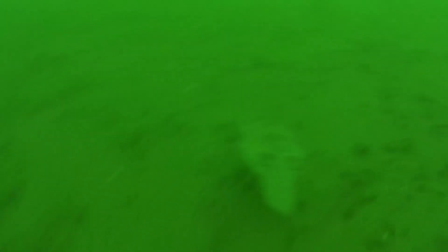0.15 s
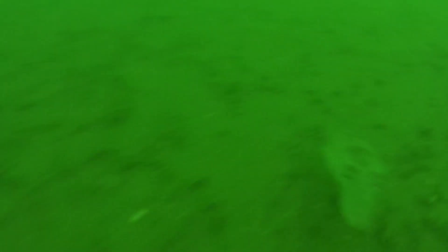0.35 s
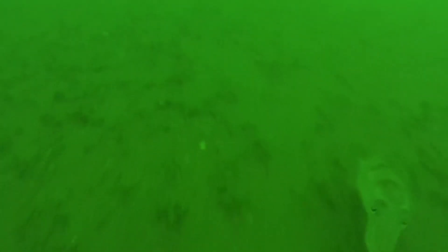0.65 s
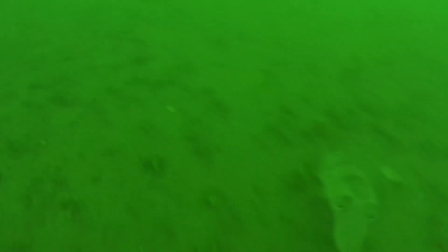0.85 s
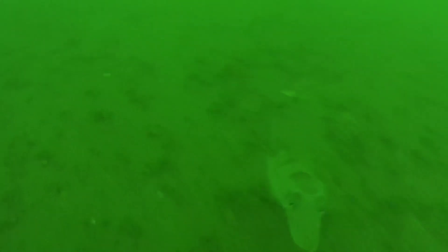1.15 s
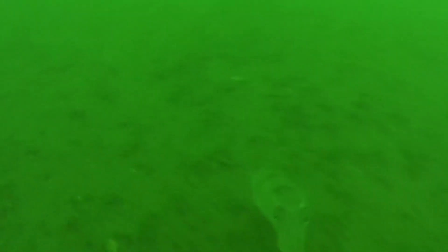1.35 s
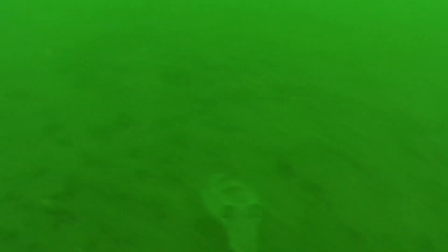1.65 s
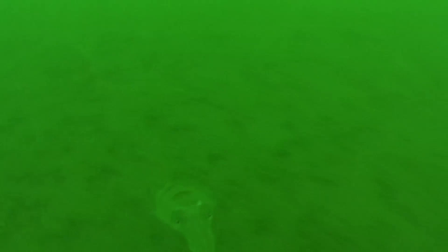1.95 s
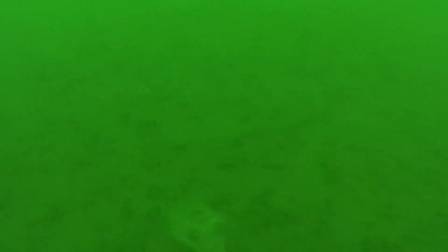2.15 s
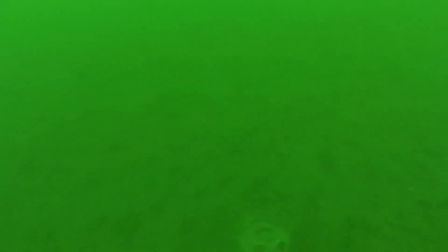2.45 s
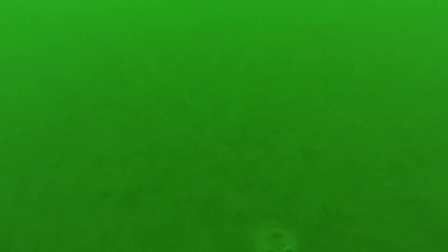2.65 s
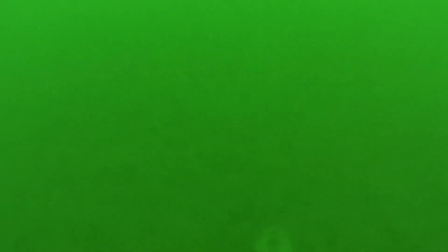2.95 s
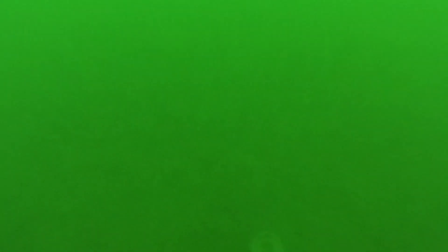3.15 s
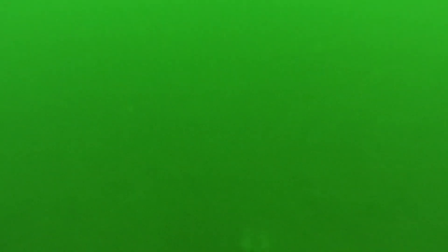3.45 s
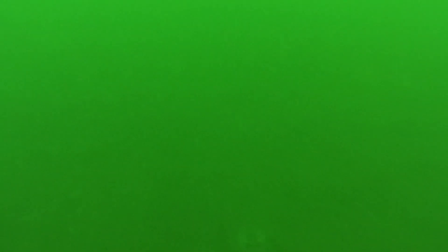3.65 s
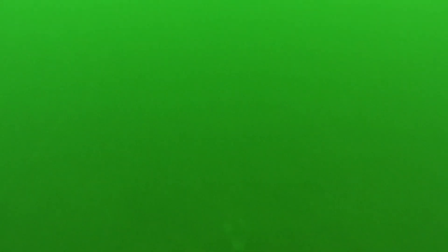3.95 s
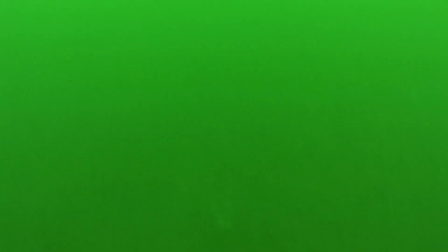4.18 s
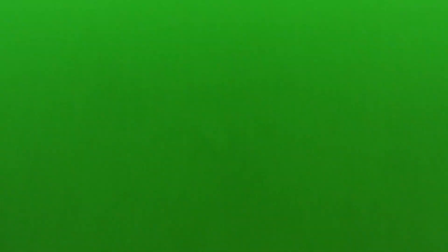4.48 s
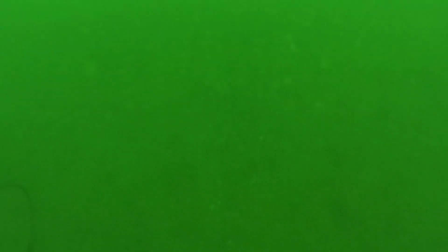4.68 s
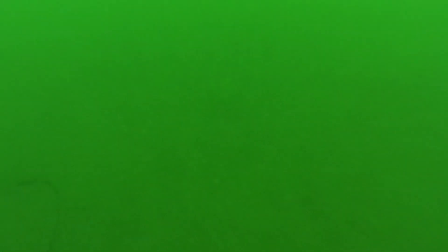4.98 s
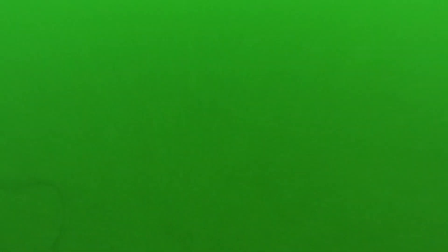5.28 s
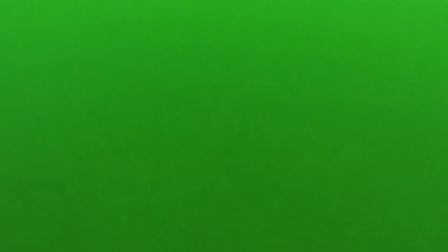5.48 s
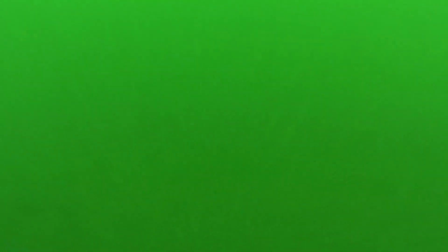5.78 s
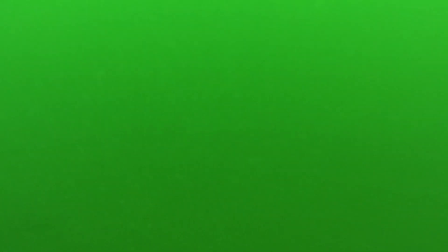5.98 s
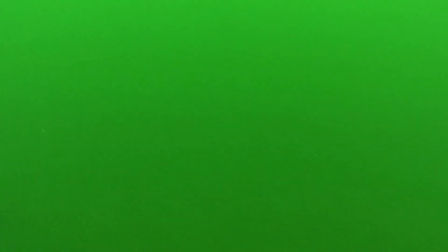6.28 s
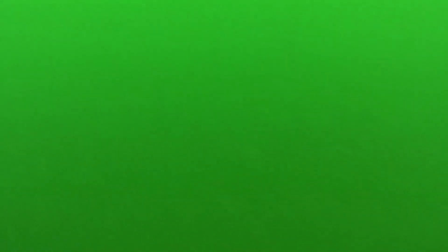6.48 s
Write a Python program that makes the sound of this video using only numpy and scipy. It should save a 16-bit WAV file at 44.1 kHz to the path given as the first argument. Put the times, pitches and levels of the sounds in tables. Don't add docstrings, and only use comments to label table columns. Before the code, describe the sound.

Muffled boat motor and soft hiss beneath the sea, dotted with small clicks, until a close propeller abruptly roars, crackles with bubbles and cuts off.

```python
import sys
import numpy as np
from scipy import signal
from scipy.fft import rfft, irfft, next_fast_len
from scipy.io import wavfile
from scipy.ndimage import map_coordinates

SR = 44100
rng = np.random.default_rng(int(sys.argv[2]) if len(sys.argv) > 2 else 0)


def persist_wave(psi):
    counts = np.round(np.clip(psi, -1, 1) * 32767).astype(np.int16)
    wavfile.write(sys.argv[1], SR, np.atleast_2d(counts).T)


def volts(x):
    e = np.asarray(x, float) / 20
    return 10 ** e


N = 291942


def unit(x):
    return x / np.sqrt(np.mean(x ** 2) + 1e-20)


def along(points, hz):
    f, v = np.transpose(points)
    return np.interp(np.log(hz + 1), np.log(f + 1), v)


def curves(rows):
    s, *cols = np.transpose(rows)
    return [np.interp(np.arange(N) / SR, s, c) for c in cols]


def wobble(rate):
    knots = rng.standard_normal(int(N * rate / SR) + 4)
    return map_coordinates(knots, [np.arange(N) * rate / SR])


def filtered(x, response):
    m = next_fast_len(N + SR // 2)
    hz = np.fft.rfftfreq(m, 1 / SR)
    return irfft(rfft(x, m) * response(hz), m)[..., :N]


def above(hz, edge_hz):
    return 1 / (1 + (edge_hz / (hz + 1)) ** 6)


# frequency in Hz, level in dB per Hz.
HISS_SPECTRUM = [(20, -3), (45, 3), (100, 10.5), (300, 4.5), (2000, 9.5), (4000, 2), (7000, -2),
                 (11000, -4.5)]
# frequency in Hz, likeness from 0 to 1.
HISS_LIKENESS = [(60, 0.99), (500, .3), (4000, 0.04), (6000, 0.097), (8000, 0.14), (10000, 0.53)]


def hiss():
    def spread(hz):
        angle = np.arccos(np.clip(along(HISS_LIKENESS, hz), -1, 1)) / 2
        return volts(along(HISS_SPECTRUM, hz)) * [np.cos(angle), np.sin(angle)]

    mid, side = filtered(rng.standard_normal((2, N)), spread)
    return volts(-64.5) * unit(np.array([mid + side, mid - side]))


HOUSING_MODES = [(171.0, 153.0, 0.52, 0.38, 0.83, 0.64), (289.0, 45.0, -0.06, 0.01, 1.05, 0.69),
                 (355.0, 77.0, 0.76, 0.24, 0.9, 0.35), (503.0, 127.0, 1.25, -0.54, 0.67, -0.27),
                 (583.0, 43.0, -0.42, 0.59, -0.63, 0.75), (683.0, 61.0, -0.33, -3.77, -1.04, -4.26),
                 (717.0, 42.0, -1.15, 1.59, -0.99, 3.95), (839.0, 113.0, -2.23, 2.92, -2.84, 2.95),
                 (938.0, 131.0, -1.2, 2.03, 0.31, 2.93), (1000.0, 63.0, 1.57, 4.63, 0.86, 1.42),
                 (1098.0, 152.0, -0.48, -0.23, -0.62, -0.74),
                 (1256.0, 989.0, 2.5, 1.01, 1.99, 1.17), (1520.0, 267.0, -0.87, 5.24, -1.11, 3.76),
              (1659.0, 186.0, 3.89, -2.67, 2.54, -1.95), (2020.0, 255.0, 0.01, 2.23, -0.6, 1.9),
              (2170.0, 2647.0, -3.55, -2.57, -1.26, -1.69), (2210.0, 367.0, 3.52, -2.52, 1.88, -2.14),
              (2300.0, 244.0, 0.96, 4.07, 2.58, 4.1), (2810.0, 437.0, 1.63, 2.08, 0.51, 1.57),
              (2980.0, 205.0, 0.77, 0.28, 0.84, 0.64), (3330.0, 333.0, 1.95, 1.07, 1.0, 0.89),
              (3550.0, 166.0, 0.71, -0.26, 1.68, 0.63),
                 (4400.0, 452.0, -0.18, 0.54, 0.62, 1.62), (5500.0, 607.0, -0.93, -0.52, -2.57, 1.81),
                (5720.0, 808.0, -0.69, 0.56, 9.69, 5.0), (5830.0, 1136.0, 1.72, 0.61, -5.38, -4.41),
                (6930.0, 2482.0, -0.01, -0.27, 1.07, 0.86), (8940.0, 681.0, 0.03, -0.08, 0.39, 0.24),
                (9020.0, 61129.0, 0.83, 0.93, -0.39, -0.19), (9560.0, 422.0, -0.03, -0.09, -0.77, -0.74)]
# frequency in Hz, level in dB per Hz.
WATER_PATH = [(20, -70), (60, -30), (200, 0), (1200, 0), (2500, -14), (4000, -28), (11000, -36),
              (20000, -40)]


def housing(pressure, scattered, column, scattered_db):
    center, width, *gains = np.transpose(HOUSING_MODES)
    center, width = center[:, None], width[:, None]
    port_gains = np.array(gains[column:column + 2])
    f = np.fft.rfftfreq(8192, 1 / SR)
    modes = 1j * f * width / (center ** 2 - f * f + 1j * f * width) * volts(along(WATER_PATH, f))
    direct = port_gains @ modes
    diffuse = np.sqrt(port_gains ** 2 @ np.abs(modes) ** 2)

    def ports(pair):
        return lambda hz: np.array([np.interp(hz, f, h) for h in pair])

    heard = filtered(pressure, ports(direct))
    heard = heard + volts(scattered_db) * filtered(scattered, ports(diffuse))
    return heard / np.sqrt(np.mean(np.abs(direct) ** 2))


# time in seconds, firings ahead of the mean rate, loudness in dB,
# load in dB, clearness of the water path in dB.
ENGINE_COURSE = [
    (0, -0.57, -40, -1.5, -6.5),
    (1, -0.14, -40.5, -3.5, -4.5),
    (1.9, 0.2, -42.5, -2.5, 3),
    (2.6, 0.46, -43, -5.5, 2),
    (3.2, 0.57, -43.5, 2, 0),
    (3.5, -0.03, -42, 0, -0.8),
    (4.25, -0.27, -41.5, -1, 2.5),
    (5, -0.27, -43.5, -1, -3),
    (6.62, -0.21, -41, -2.5, -10),
]
# pitch in Hz, width in Hz, lag in firings.
HULL_PANELS = [(170, 160, -0.041), (417, 300, 0.0453), (700, 220, -0.045), (999.6, 134, -0.1997),
               (1700, 123, -.1), (2307, 290, -.2), (3300, 2100, -0.17)]
CYLINDER_BLOWS = [(-9, -22, -25, 4.7, -20, -6), (-21, 1, -17, 8, -0.5, -6), (3, -13, -10, 1.5, -1, 0.5),
                  (1.5, 3, 8, 7.8, 6, 8), (4.5, 7.5, 0, 6.3, 0, -5), (12, 4.5, -3, 8, 4, -5),
                  (11, 9, -22, 1, -12, -10)]
# frequency in Hz, level in dB rms.
ENGINE_HUM = [(59.2, -86.5)]
FIRING_HZ = 29.7


def engine():
    ahead, wash_db, load_db, clear_db = curves(ENGINE_COURSE)
    outer_db = -0.4 + 0.23 * clear_db
    turns = FIRING_HZ * np.arange(N) / SR + ahead
    firings = np.arange(int(turns[-1]))
    noise = rng.standard_normal((3, N))
    throb = volts(0.69 * np.cos(2 * np.pi * (turns + 0.16)))

    def thinned(f):
        gaps = [(995, 80, 0.5), (2320, 200, 0.12), (5750, 500, 0.2), (3400, 450, 0.3)]  # Hz, width Hz, depth
        return 1 - sum(depth * np.exp(-((f - hz) / width_hz) ** 2) for hz, width_hz, depth in gaps)

    wash = filtered(throb * noise[0], thinned)
    core = filtered(wash, lambda f: above(f, 720) - above(f, 2400))
    pressure = core + volts(outer_db) * (wash - core)
    for (hz, width_hz, lag), blow_db in zip(HULL_PANELS, CYLINDER_BLOWS):
        chance = rng.standard_normal((len(firings), 3))
        at = np.searchsorted(turns, firings + lag + 0.0342 * chance[:, 0])
        effort_db = (load_db if hz < 1300 else clear_db)[at]
        size = volts(np.array(blow_db)[firings % len(blow_db)] + effort_db + 0.94 * chance[:, 1] + 2)
        blows = np.bincount(at, size * np.sign(chance[:, 2]) * np.sqrt(SR / width_hz), N)
        pressure += filtered(blows, lambda f: (1j * f * width_hz / (hz * hz - f * f + 1j * f * width_hz)) ** 2)
    level = volts(wash_db + 0.6 * wobble(9))
    scattered = filtered(volts(outer_db) * noise[1:], lambda f: 1 - 0.25 * above(f, 4100))
    heard = housing(level * pressure, level * scattered, column=0, scattered_db=-20.0)
    hum_level = volts(ENGINE_HUM[0][1] + 1 + 0.8 * wobble(3.1))
    return heard + hum_level * np.sin(2 * 2 * np.pi * turns)


# start in seconds, peak level in dB, pitch in Hz.
VALVE_TICKS = [(0.2068, -60, 3390), (0.7431, -61, 3340), (0.9402, -65, 3410), (1.04, -57, 3360),
               (1.1721, -67, 3360), (1.2077, -63, 3320), (1.4061, -58, 3350), (1.506, -65, 3400),
               (2.2721, -64, 3390), (2.4058, -63, 3400), (2.4393, -66, 3380), (3.0065, -63, 3310),
               (3.244, -62, 3350), (3.2778, -60, 3360), (3.5936, -62, 3550), (3.6959, -64, 3550),
               (3.7922, -63, 3500), (3.8351, -62, 3390), (4.0037, -62, 3470)]


def ticks():
    out, t = np.zeros(N + SR), np.arange(SR // 20) / SR
    for s, db, hz in VALVE_TICKS:
        fade = volts(db + 5.5 - 60 * t / 0.027)
        onset = 1 - np.exp(-t / 0.0016)
        out[round(s * SR):][:len(t)] += fade * onset * np.sin(2 * np.pi * hz * t)
    return out[:N] * volts([[3], [-4]])


# start in seconds, peak level in dB.
SHRIMP_SNAPS = [(0.3325, -57), (1.7069, -61), (1.8094, -59), (2.4268, -57), (2.4926, -60), (3.0094, -63),
                (3.3078, -61)]


def snaps():
    t = np.arange(N) / SR
    shape = sum(volts(db + 3 - 60 * np.abs(t - s) / 0.008) * (t > s) for s, db in SHRIMP_SNAPS)
    return filtered(shape * rng.standard_normal(N), lambda f: above(f, 3200))


# time in seconds, thrust in dB.
THRUST = [
    (4.4, -7.5),
    (4.65, -5.5),
    (4.85, -3),
    (5.1, -1.1),
    (5.5, 0.5),
    (5.65, 0),
    (5.8, -0.5),
    (6.15, 0.1),
]
# level in dB at full thrust, share of the thrust, rise in dB per second,
# lingering in seconds, fall in dB per second.
BUBBLE_LAYERS = [
    (-32, 1.35, 167, .001, 74),
    (-31.5, 2.4, 300, -0.011, 450),
    (-34, 0.38, 280, .005, 450),
    (-32, 0.038, 248, 0.047, 160),
    (-34, 0.32, 118, -0.019, 125),
]


def churn():
    bite_s, cut_s = 4.41, 6.155
    thrust_db, = curves(THRUST)
    t = np.arange(N) / SR
    layers = []
    for db, share, rise, lingers, fall in BUBBLE_LAYERS:
        before_db = rise * np.maximum(bite_s - t, 0)
        after_db = fall * np.maximum(t - cut_s - lingers, 0)
        layers.append(db + share * thrust_db - before_db - after_db)
    return layers


# start in seconds, peak level in dB.
PUSH_SURGES = [(4.602, -28), (5, -19), (5.135, -26), (5.331, -27), (5.371, -24), (5.693, -24), (5.798, -20),
               (5.823, -25), (5.859, -22), (5.901, -20), (6.112, -26), (6.131, -13)]
# frequency in Hz, level in dB per Hz.
SWIRL_SPECTRUM = [(15, -1), (50, 2), (90, 8), (150, -30), (400, -88)]


def propeller():
    body_db, deep_db, rumble_db, upper_db, fizz_db = churn()
    noise = rng.standard_normal((9, N))
    shared = wobble(55)

    def clumps():
        return unit(volts(0.2 * wobble(14) + 1.6 * wobble(50) + 1.3 * shared))

    collapses = unit(noise[0] * (rng.random(N) < 150 / SR))
    rumble = filtered(volts(rumble_db + 1.9 * shared) * noise[1], lambda f: above(f, 185) - above(f, 750))
    rumble += filtered(volts(deep_db + 0.8 * shared) * noise[1], lambda f: above(f, 112) - above(f, 185))
    body = filtered(volts(body_db) * (clumps() * noise[2] + 0.25 * collapses),
                    lambda f: above(f, 607) - above(f, 1146) + 0.7 * (above(f, 2200) - above(f, 3800)))
    upper = filtered(volts(upper_db) * clumps() * noise[3], lambda f: above(f, 990) - above(f, 1950))
    fizz_level = volts(fizz_db + 0.32 * wobble(19) + 1.4 * shared)
    fizz = filtered(fizz_level * noise[4], lambda f: above(f, 2040))
    bursts = np.zeros(N)
    for s, db in PUSH_SURGES:
        t = np.arange(N) / SR - s
        bursts += volts(db - 3.5 - 60 * np.abs(t) / 0.018) * (t > 0) * noise[2]
    level = volts(3.5)
    pressure = level * (rumble + body + upper + fizz) + filtered(bursts, lambda f: 1 - above(f, 2000))
    heard = housing(pressure, level * volts(body_db) * noise[5:7], column=2, scattered_db=-17.5)
    swirl = unit(filtered(noise[7:], lambda f: volts(along(SWIRL_SPECTRUM, f))))
    return heard + volts(rumble_db - 42 + 3.5 * wobble(12)) * swirl


def scene():
    return hiss() + engine() + ticks() + snaps() + propeller()


def band_limit(x):
    return signal.sosfilt(signal.butter(12, 11160, fs=SR, output="sos"), x)


def record(dry):
    mix = filtered(dry, lambda f: 1 - 0.79 * above(f, 10400) ** 2)
    return band_limit(mix)


dry = scene()
out = record(dry)
persist_wave(out)
```